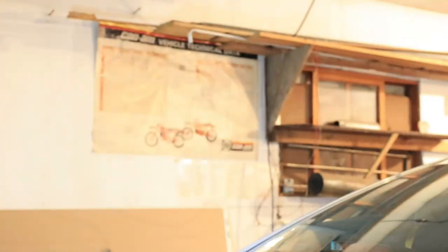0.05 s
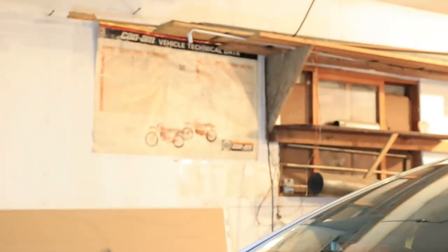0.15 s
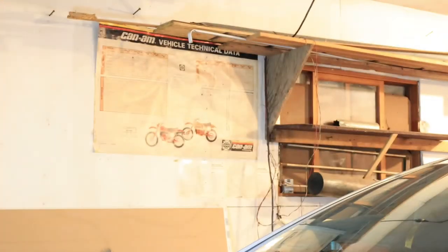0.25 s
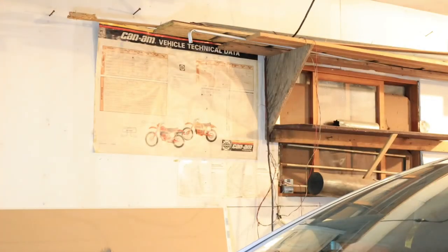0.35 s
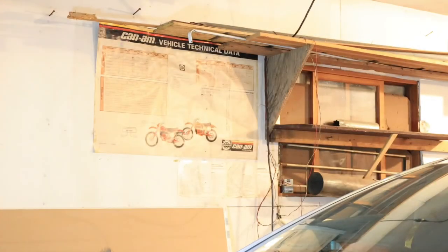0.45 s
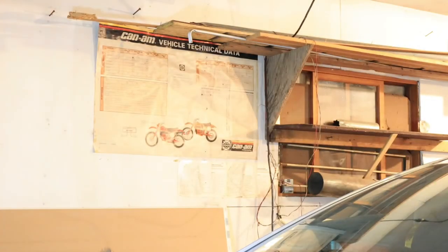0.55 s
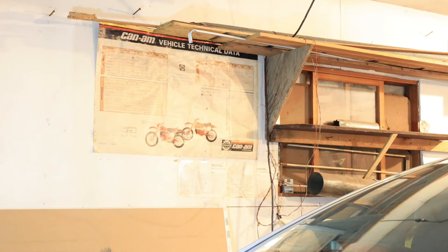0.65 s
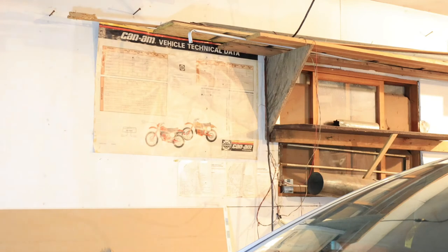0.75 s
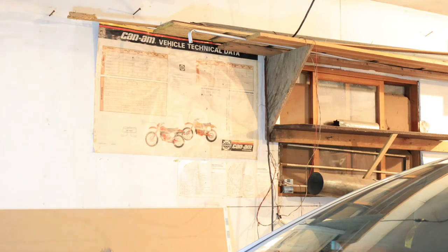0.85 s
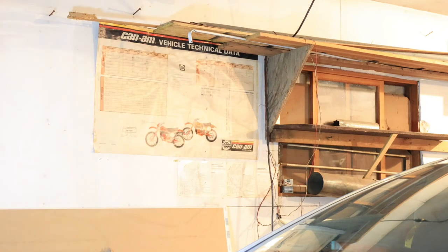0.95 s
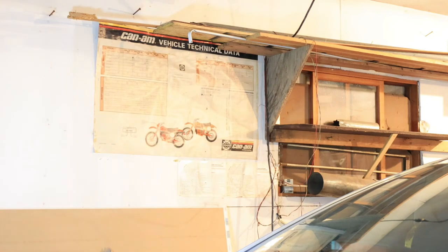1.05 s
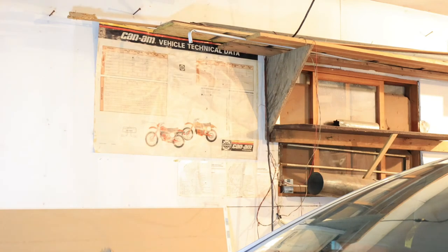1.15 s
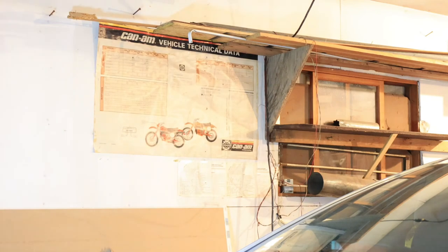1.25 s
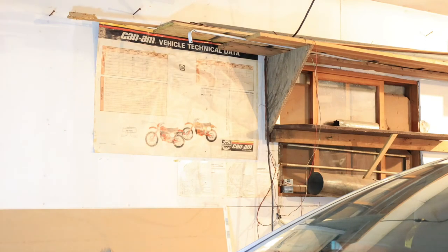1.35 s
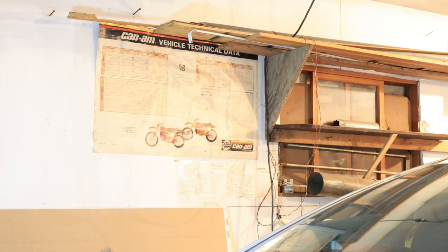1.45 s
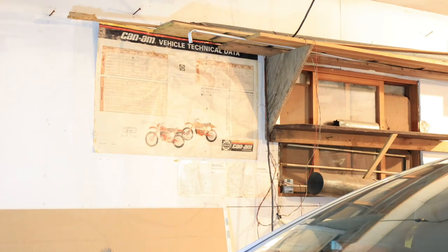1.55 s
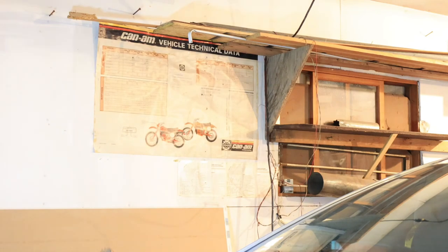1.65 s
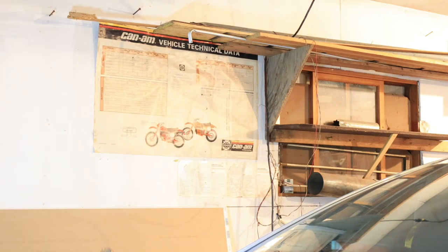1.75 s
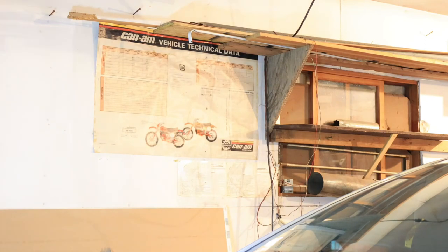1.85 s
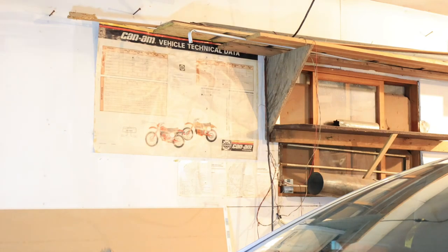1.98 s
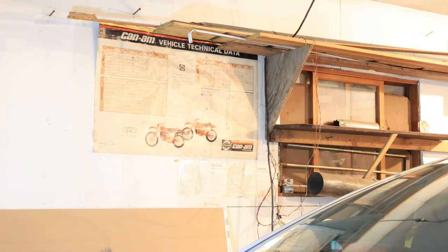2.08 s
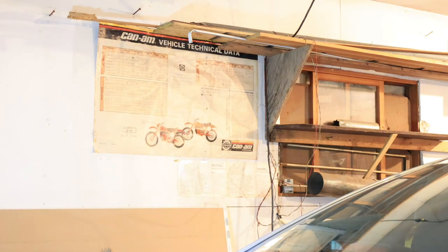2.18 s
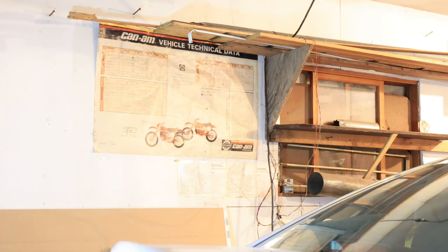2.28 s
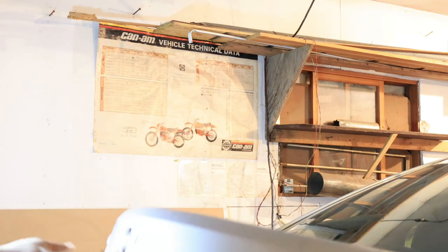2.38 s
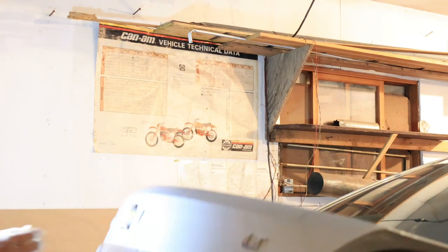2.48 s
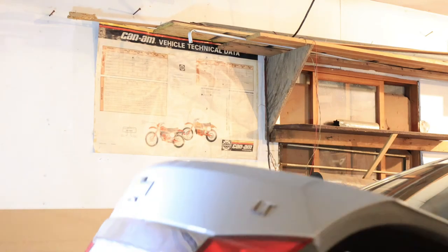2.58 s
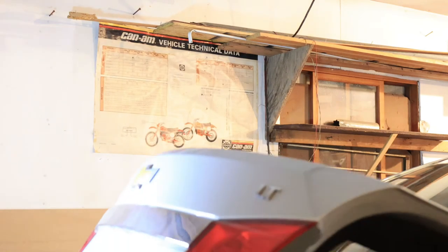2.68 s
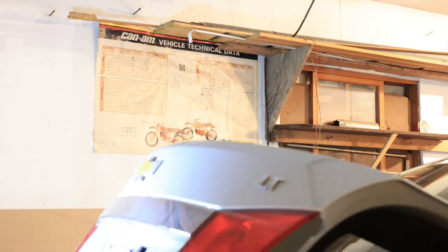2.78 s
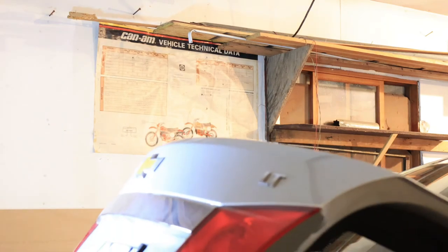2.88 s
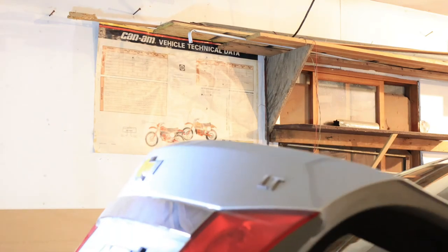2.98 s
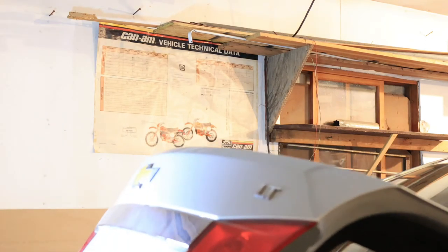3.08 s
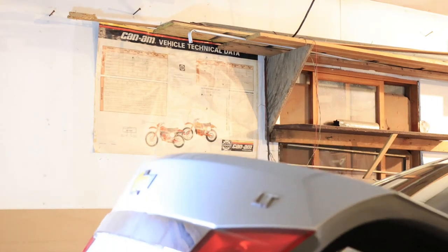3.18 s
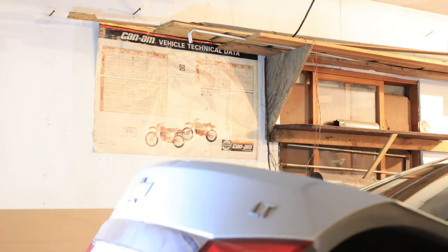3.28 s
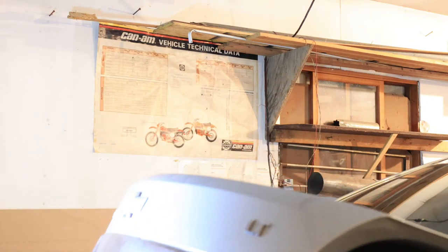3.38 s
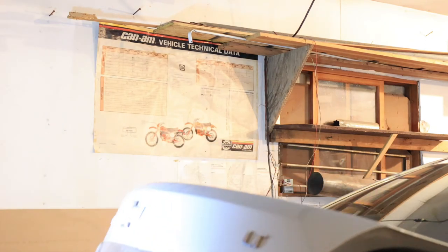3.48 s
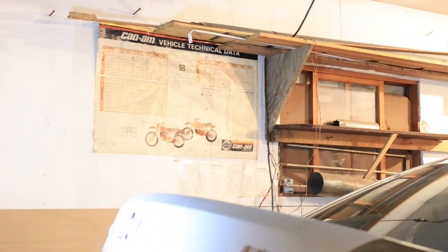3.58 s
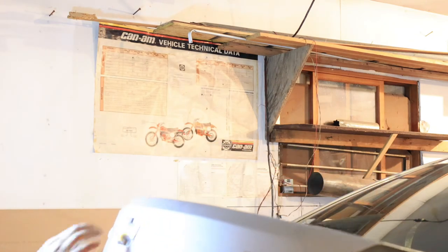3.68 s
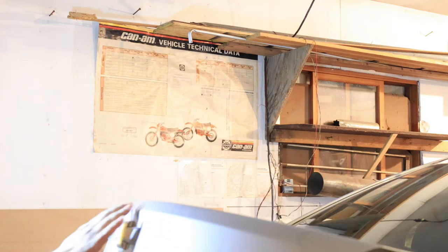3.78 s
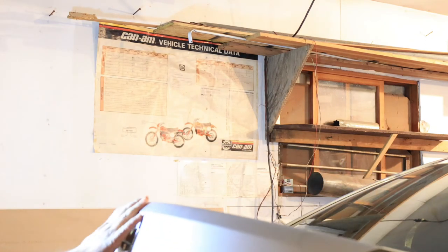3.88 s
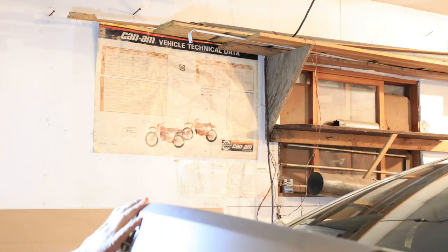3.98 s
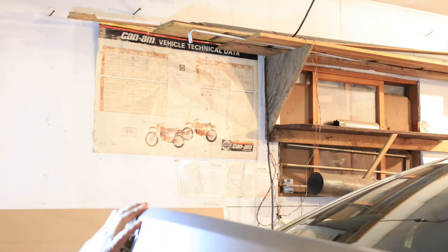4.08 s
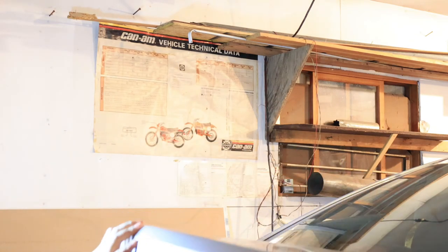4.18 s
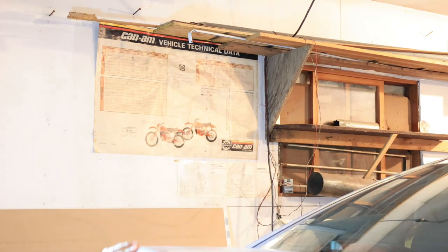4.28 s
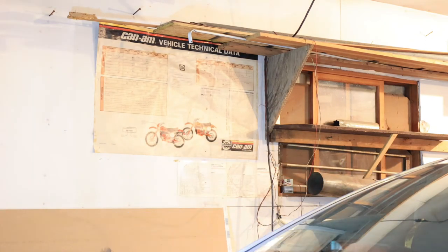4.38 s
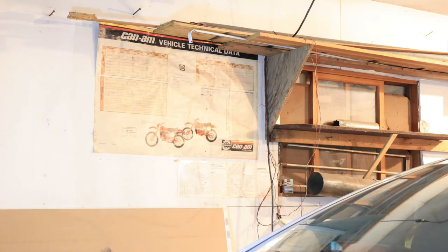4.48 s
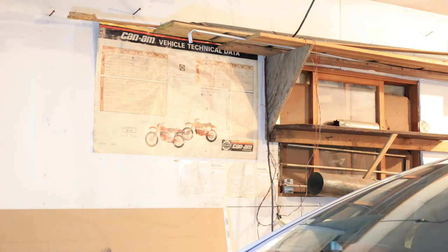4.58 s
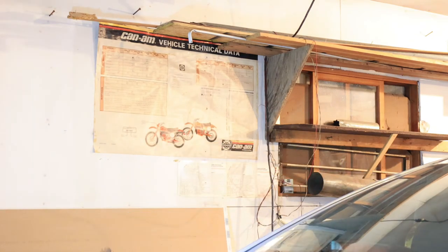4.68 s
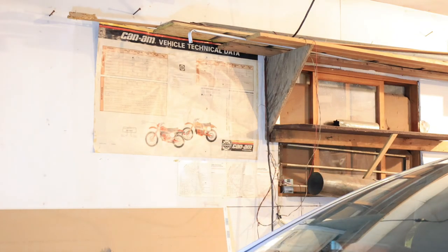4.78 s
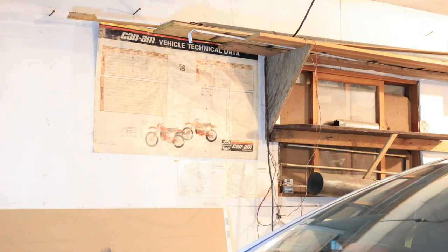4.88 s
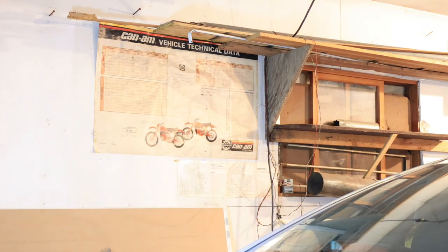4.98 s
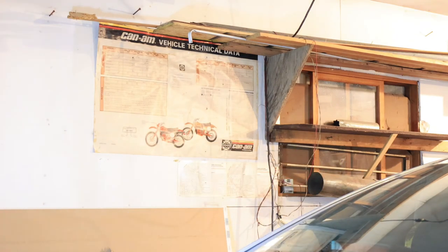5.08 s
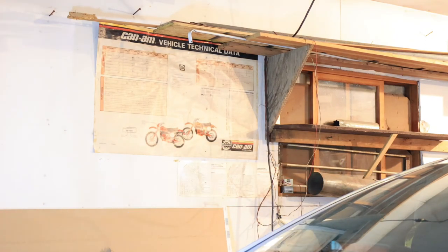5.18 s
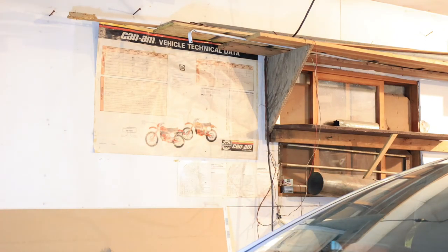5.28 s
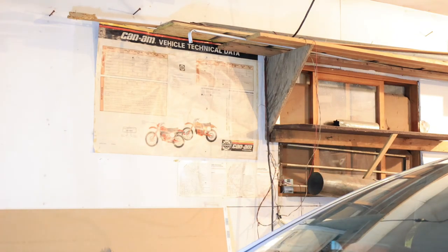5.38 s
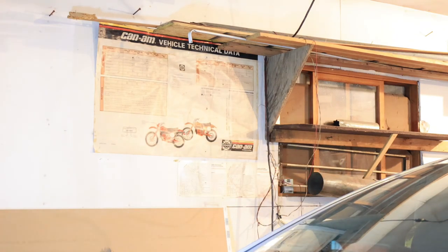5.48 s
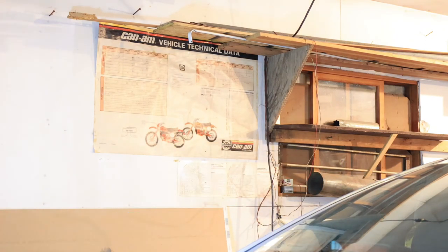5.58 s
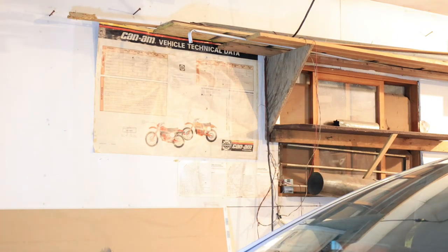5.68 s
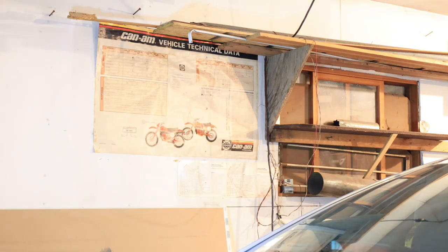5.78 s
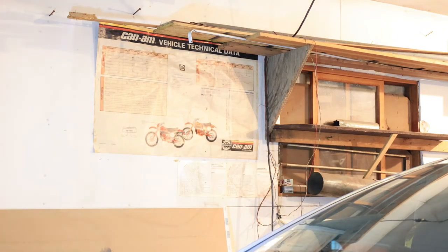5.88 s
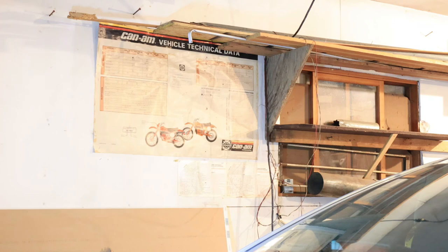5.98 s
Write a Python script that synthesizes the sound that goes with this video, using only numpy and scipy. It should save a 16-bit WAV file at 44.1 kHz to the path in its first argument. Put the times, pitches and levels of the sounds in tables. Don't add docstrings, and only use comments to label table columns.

```python
import sys
import numpy as np
from scipy import signal
from scipy.fft import rfft, irfft
from scipy.io import wavfile
from scipy.ndimage import uniform_filter1d

SR = 44100
rng = np.random.default_rng(int(sys.argv[2]) if len(sys.argv) > 2 else 0)


def level_to_linear(level):
    exponent = np.asarray(level, float) / 20
    return 10 ** exponent


def unload_audio(sound):
    columns = np.transpose(np.atleast_2d(sound))
    steps = np.round(np.clip(columns, -1, 1) * 32767)
    wavfile.write(sys.argv[1], SR, steps.astype(np.int16))


N = 266364
T = np.arange(N) / SR

# pitch_hz, level_db (per Hz)
DRONE_SPECTRUM = [(12, -17), (25, -10), (55, -1.5), (118, -4.5), (200, -4.5), (320, -13), (530, -13),
                  (775, -20), (1300, -23.5), (2500, -33), (3500, -61.5)]
# pitch_hz, level_db
HUM_LINES = [(120, -75), (359, -76), (515, -79.5)]
# time_s, level_db
LOW_HUM_LEVEL = [(0, -71.5), (.5, -72.5), (.82, -65.5), (1.02, -75.5), (2.19, -72.5), (2.74, -80.5),
                 (3.62, -84), (3.92, -71.5), (4.46, -77.5), (4.65, -66), (5.15, -70.5), (5.65, -71.5),
                 (6.04, -64.5)]
# time_s, level_db
MOVING_LEVEL = [(0, -69), (.13, -64), (.3, -71), (1.3, -79.5), (2.07, -79), (3.0, -90), (4.09, -74.5),
                (4.46, -82.5), (5.0, -87.5), (5.62, -75.5), (6.04, -71)]
# loudest_s, level_db, brightness_db
TRIM_BUZZES = [
    (0.388, -37, -19.5),
    (2.27, -43, -34),
    (4.632, -38, -16),
    (6.04, -37.5, -21),
]
# pitch_hz, level_db
BUZZ_SPECTRUM = [(2200, -15.5), (2700, -5), (3200, -2), (3550, 0.5), (3900, -2), (4350, -4.5), (4800, -10),
                 (6500, -22.5), (9000, -42)]

# start_s, steel_db, panel_db, hardness_db, length_s
SCRAPES = [(0, -61.5, -44.5, -6.5, 0.023), (0.088, -44.5, -40.5, -15, 0.12),
           (0.422, -29.5, -24, -22.5, 0.16), (.547, -46.5, -42.5, -26, 0.17), (0.776, -48, -68, -12, 0.12),
           (1.602, -57, -54, -15.5, 0.11), (3.888, -60, -65, -3, .07), (4.429, -58, -29.5, -20, 0.12),
           (4.978, -56, -38.5, -19.5, 0.12), (5.104, -54.5, -69, 0.5, .062), (5.234, -64.5, -70, 13, 0.048),
           (2.718, -74, -70, 7, 0.058), (5.451, -73.5, -77, 17.5, .2)]
# start_s, steel_db, panel_db, hardness_db, scatter_s
TOUCHES = [(.043, -62.5, -64, 9.5, .003), (.727, -60.5, -74, -4, .01), (.794, -51.5, -48, -15, 0.022),
           (0.981, -52.5, -50, -8.5, 0.0215), (1.269, -68.5, -83, 0, .01), (1.988, -72, -71.5, 10, 0.0048),
           (3.098, -65.5, -55.5, -15, 0.024), (3.258, -50.5, -37.5, -28, 0.05),
           (5.723, -73, -60.5, 7, .009), (5.766, -76, -65, 13.5, 0.0048)]
# striker_s, force_db, approach_slowness (ratio), panel_settling_db_per_s
SLAMS = [
    (.186, 0, .9, 0),
    (4.494, -1, 1.12, -40),
]
# delay_s, steel_db, panel_db, hardness_db, scatter_s
SEAL_CONTACTS = [
    (-.025, -26, -33, -17.5, .02),
    (-.0085, -12.5, -39, -7, .01),
]
# delay_s, steel_db, panel_db, hardness_db, scatter_s
SLAM_CONTACTS = [(0, -14, -16.5, 0.5, 0.018), (.006, -17.5, -23, -10.5, 0.0065),
                 (.018, -17, -13.5, -6.5, .008), (.029, -20, -15, -3, 0.0046),
                 (0.0427, -14.5, -17, -11.5, .01), (0.0553, -19.5, -13.5, 0, 0.012),
                 (.067, -26, -24.5, -11.5, .011), (0.0859, -19.5, -15, -14.5, 0.0081)]
# first_landing_s, steel_db, loss_db (per bounce)
BOUNCES = [
    (.296, -24, -5.5),
    (4.6, -38, -5.5),
]
# start_s, steel_db, panel_db, hardness_db, scatter_s
CLICKS = [(.486, -60.5, -65, 2, 0.0036), (.525, -65, -64.5, 1.5, 0.0035), (2.491, -62, -73, 2.5, .008),
          (3.247, -47.5, -53, -3, 0.0041)]
# start_s, steel_db, panel_db, hardness_db, scatter_s
MOTOR_SWITCHES = [
    (2.095, -49.5, -66.5, -7, 0.015),
    (5.856, -48, -55, -3.5, 0.022),
]
# pawl_drop_s, force_db
RELEASES = [
    (2.159, -0.5),
    (5.932, 0),
]
# delay_s, steel_db, panel_db, hardness_db, length_s
MOTOR_GEARS = [
    (-.078, -33, -32, -17.5, 0.17),
    (0.033, -24.5, -39, -7, 0.041),
]
# delay_s, steel_db, panel_db, hardness_db, scatter_s
PAWL_PULL = [(-.0275, -26, -37, -3, 0.021), (-.004, -41, -34, -25, 0.0017), (0, -17.5, -25.5, -10.5, 0.012),
             (0.0129, -23, -18.5, -25, 0.017), (0.025, -29.5, -24.5, -22, .014),
             (.045, -28, -27, -14, 0.021)]
# delay_s, steel_db, panel_db, hardness_db, scatter_s
MOTOR_RETURN = [(0.0746, -26, -42.5, -7.5, 0.0047), (.0835, -21, -31.5, 0, 0.01),
                (.106, -24.5, -53.5, -20, 0.0072), (.332, -40.5, -63, -5.5, 0.016),
                (.348, -66, -49, -18, .016), (.587, -65.5, -55, -8, .02)]
# start_s, steel_db, panel_db, hardness_db, length_s
SLEEVE_BRUSHES = [(3.873, -61.5, -65, 1.5, 0.032), (3.902, -64.5, -66, 1.5, .05)]
TICK_DB = dict(seal=-23.5, slam=-13, bounce=-17, pull=-26.5, back=-17.5, gears=-20.5, touch=-6, scrape=-12, click=-1, switch=-14, brush=0)

# pitch_hz, level_db, t60_s
PANEL_MODES = [(73.8, -14.5, 0.49), (116.7, 1, 0.26), (139.6, -1, 0.37), (170.7, 1, 0.096),
               (220, -5.5, 0.84), (230, 1, 0.11), (262, -8, 0.15), (340, -2, 0.11), (400, -10, 0.15)]
# pitch_hz, level_db, t60_s
KNOCK_MODES = [(510, 7, 0.014), (607.2, 2, 0.036), (927, 2.5, 0.02), (1044, 0.5, 0.027), (1214, -3, 0.042),
               (1293, 0, 0.028), (1608, 4, 0.016), (1768, 1, 0.017), (2176, -6, 0.025)]
# pitch_hz, level_db, t60_s
CLACK_MODES = [(2365, 5.5, 0.023), (2750, 1, 0.014), (3240, 4, 0.0094), (3700, 7, 0.0055),
               (4200, -10.5, 0.0099)]
# pitch_hz, level_db
TICK_SPECTRUM = [(5200, 3), (6500, 2), (8000, 0), (10000, -7.5), (13000, -11), (15500, -16)]
# delay_s, level_db, push_s
SLAM_PUFFS = [(-.019, -17.5, .008), (0.018, -21.5, .01)]
# delay_s, level_db, push_s
RELEASE_PUFF = (-0.0056, -37.5, 0.0046)
# pitch_hz, level_db, t60_s
TRUNK_MODES = [(24, -6.5, 0.96), (32, 5, 0.59), (39.4, 1, 0.29), (52, 3, 0.67), (62, 4, 0.38)]
# start_s, level_db
HOLLOW_KNOCKS = [(0.578, -54), (2.505, -57), (3.248, -53)]
# pitch_hz, level_db, t60_s
HOLLOW_MODES = [(211.9, -3.5, 0.13), (274.4, 2.5, 0.0875), (359, -12, 0.39), (442, 6, 0.031),
                (561.4, -1, 0.082), (710, -2, 0.027), (933, -1.5, 0.056)]
# start_s, length_s, low_hz, high_hz, level_db
SQUEAKS = [(.68, .32, 1320, 3530, -75), (.74, .22, 1810, 4430, -79), (3.875, .06, 3810, 5950, -78),
           (5.11, .075, 1920, 2900, -80), (5.238, .05, 2410, 3860, -78), (5.862, .03, 3700, 5400, -74)]
# start_s, level_db
BIRD_PHRASES = [(1.77, 1), (3.609, -1), (5.478, -1)]
# delay_s, length_s, from_hz, to_hz, level_db
BIRD_NOTES = [(-.06, .13, 3400, 3450, -89), (0, 0.066, 4200, 4200, -79), (.028, .08, 3700, 3690, -80.5),
              (0.033, 0.099, 3180, 3100, -84)]
# pitch_hz, t60_s, level_db
GARAGE_BANDS = [(69, 0.31, -9), (120.9, 0.52, -8), (270, 0.57, -7), (516, 0.63, -3), (926, 0.56, -3.5),
                (1970, 0.63, -6), (4000, 0.47, -3.5), (8300, 0.44, -5), (13500, 0.17, -10)]
# pitch_hz, level_db (per Hz)
HISS_SPECTRUM = [(30, -3.5), (300, -1.5), (900, -6), (2200, -8), (4300, -10), (8600, -13), (15500, -15)]


def level(x, db):
    return x * level_to_linear(db) / np.sqrt(np.mean(x ** 2))


def noise():
    return rng.standard_normal(N)


def colour(x, points):
    hz, db = np.transpose(points)
    log_hz = np.log(np.maximum(np.arange(len(x) // 2 + 1) * SR / len(x), 1))
    return irfft(rfft(x) * level_to_linear(np.interp(log_hz, np.log(hz), db)), len(x))


def band(x, lo_hz, hi_hz, order=2):
    sos = signal.butter(order, [lo_hz, min(hi_hz, .45 * SR)], "band", fs=SR, output="sos")
    return signal.sosfilt(sos, x)


def walk(rate_hz):
    k = int(SR / rate_hz)
    return level(uniform_filter1d(uniform_filter1d(noise(), k), k), 0)


def ring(x, modes):
    t = T[:SR]
    body = 0
    for k, (hz, db, t60) in enumerate(modes):
        body = body + (-1) ** k * level_to_linear(db) * np.sin(2 * np.pi * hz * t) * 1000. ** (-t / t60)
    return signal.fftconvolve(x, body / np.sqrt(np.sum(body ** 2)))[:N]


def pushes(rows, modes):
    force = 0
    for s, db, length in rows:
        push = np.sin(np.pi * np.clip((T - s) / length, 0, 1))
        force = force + level_to_linear(db) * push / np.sqrt(length * SR)
    return ring(force, modes) * level_to_linear(22.5)


def rustle_levels():
    moving = level_to_linear(np.interp(T, *np.transpose(MOVING_LEVEL)))
    low, high = moving, moving * level_to_linear(-5)
    for s, db, bright_db in TRIM_BUZZES:
        swell_db = 300 * (T - s)
        buzz = level_to_linear(db + np.minimum(swell_db, 172 * (s - T)))
        linger = level_to_linear(db - 23 + np.minimum(swell_db, 35 * (s - T)))
        low = low + buzz + linger
        high = high + buzz * level_to_linear(bright_db) + linger * level_to_linear(-4.5)
    return low, high


def surroundings():
    low_gain, high_gain = rustle_levels()
    drone = level(colour(noise(), DRONE_SPECTRUM), -67) * level_to_linear(0.85 * walk(4.2))
    hum = sum(level(band(noise(), hz * .975, hz * 1.025), db) for hz, db in HUM_LINES)
    low_hum = level(band(noise(), 74, 88), 7.9) * level_to_linear(np.interp(T, *np.transpose(LOW_HUM_LEVEL)))
    low = level(band(noise(), 320, 1600), 4.5) * low_gain * level_to_linear(1.6 * walk(30))
    high = level(colour(noise(), [(1200, -42)] + BUZZ_SPECTRUM), 4.1)
    high = high * high_gain * level_to_linear(2.9 * walk(33))
    return drone + hum + low_hum + low + high


def earlier_push():
    return level_to_linear(-47.5) * np.sin(2 * np.pi * 127 * T) * 1000. ** (-T / 0.33)


def placed(blows, sequence):
    return [(s + delay, steel_db + db, panel_db + db, *rest)
            for s, db in blows for delay, steel_db, panel_db, *rest in sequence]


def slam_strikes(sequence):
    rows = []
    for s, force_db, slow, settle in SLAMS:
        for delay, steel_db, panel_db, hard_db, scatter in sequence:
            start = s + delay * (slow if delay < 0 else 1)
            settled_db = panel_db + force_db + settle * max(delay, 0)
            rows.append((start, steel_db + force_db, settled_db, hard_db, scatter))
    return rows


def trim_bounces():
    flights = .0525 * .935 ** np.arange(6)
    landing_delays = np.cumsum(flights) - flights

    def landings(extra_loss_db):
        return [(s + delay, db + k ** 1.3 * (loss_db + extra_loss_db))
                for s, db, loss_db in BOUNCES for k, delay in enumerate(landing_delays)]

    first_edge, second_edge = [(0, 0, -7, 2.5, .0035)], [(.0105, -1.5, -14, 2.5, .0035)]
    return placed(landings(0), first_edge) + placed(landings(-2.5), second_edge)


def strikes():
    return [("scrape", 1, SCRAPES), ("touch", 0, TOUCHES),
            ("seal", 0, slam_strikes(SEAL_CONTACTS)), ("slam", 0, slam_strikes(SLAM_CONTACTS)),
            ("bounce", 0, trim_bounces()), ("click", 0, CLICKS),
            ("gears", 1, placed(RELEASES, MOTOR_GEARS)), ("switch", 0, MOTOR_SWITCHES),
            ("pull", 0, placed(RELEASES, PAWL_PULL)), ("back", 0, placed(RELEASES, MOTOR_RETURN)),
            ("brush", 1, SLEEVE_BRUSHES)]


def impact_spray(sliding, span):
    t = T[:SR // 4]
    chance = rng.standard_normal((5, len(t)))
    spray = chance[:4] * level_to_linear(2.5 * np.abs(chance[4]))
    if sliding:
        spray *= np.sin(np.pi * np.minimum(t / span, 1)) ** 0.54
    else:
        fade_s = np.clip(span * np.array([[1], [1], [.8], [.45]]), .0005, .05)
        spray *= np.exp(-t / fade_s) * (1 - np.exp(-t / .0005))
        spray[0] = 0.5 * spray[0] - 3 * t / 0.00073 * np.exp(-t / .0006)
    return spray / np.sqrt(np.sum(spray ** 2, axis=1, keepdims=True))


def contacts():
    force = np.zeros((4, N + SR))
    for kind, sliding, rows in strikes():
        for s, knock_db, thump_db, hard_db, span in rows:
            clack_db = knock_db + hard_db
            levels_db = np.array([[thump_db], [knock_db], [clack_db], [clack_db + TICK_DB[kind]]])
            start, spray = int(s * SR), impact_spray(sliding, span)
            force[:, start:start + spray.shape[1]] += spray * level_to_linear(levels_db)
    thump, knock, clack, tick = force[:, :N]
    knock = band(knock, 350, 2800, order=3)
    clack = band(clack, 2400, 4800, order=3)
    steel = ring(knock, KNOCK_MODES) * level_to_linear(23.5) + knock * level_to_linear(28.0)
    steel += ring(clack, CLACK_MODES) * level_to_linear(23.5) + clack * level_to_linear(24.0)
    steel += colour(tick, [(3500, -30.0)] + TICK_SPECTRUM) * level_to_linear(29.0)
    panel = ring(thump, PANEL_MODES) * level_to_linear(6.0) + band(thump, 160, 420) * level_to_linear(36.5)
    return steel + panel


def trunk_air():
    puffs = [(s + delay, db + puff_db, length)
             for s, db, *_ in SLAMS for delay, puff_db, length in SLAM_PUFFS]
    delay, puff_db, length = RELEASE_PUFF
    puffs += [(s + delay, db + puff_db, length) for s, db in RELEASES]
    return pushes(puffs, TRUNK_MODES) * level_to_linear(-19.0)


def hollow_knocks():
    return pushes([(s, db + 9.0, .0006) for s, db in HOLLOW_KNOCKS], HOLLOW_MODES)


def squeaks():
    out = 0
    for s, length, low_hz, high_hz, db in SQUEAKS:
        pair = sum(level(band(noise(), hz - 70, hz + 70), db) for hz in (low_hz, high_hz))
        out = out + pair * np.sin(np.pi * np.clip((T - s) / length, 0, 1))
    return out


def bird():
    out = np.zeros(N)
    for start, phrase_db in BIRD_PHRASES:
        for delay, length, from_hz, to_hz, db in BIRD_NOTES:
            progress = np.clip((T - start - delay) / length, 0, 1)
            hz = (from_hz + (to_hz - from_hz) * progress) * (1 + .02 * walk(400))
            loudness = level_to_linear(db + phrase_db + 10 + 3.3 * walk(300)) * np.sin(np.pi * progress)
            out += loudness * np.sin(2 * np.pi * np.cumsum(hz) / SR)
    return out


def garage(x):
    t = T[:int(1.5 * SR)]
    tail = 0
    for hz, t60, db in GARAGE_BANDS:
        part = band(rng.standard_normal(len(t)), hz / 1.414, hz * 1.38)
        part = part * 1000. ** (-t / t60) * (1 - np.exp(-t / 0.0009))
        tail = tail + part * level_to_linear(db) / np.sqrt(np.sum(part ** 2) / (hz * 1.3 / SR))
    return x + signal.fftconvolve(x, tail)[:N]


def scene():
    echoing = garage(contacts() + hollow_knocks() + squeaks() + bird())
    left = surroundings() + earlier_push() + echoing + trunk_air()
    return np.array([left, np.zeros(N)])


def band_limit(x):
    return signal.sosfilt(signal.butter(12, 15730, fs=SR, output="sos"), x)


def record(dry):
    left = np.tanh(.55 * dry[0]) / 0.56
    leak = signal.lfilter(*signal.butter(1, 105, fs=SR), left) * level_to_linear(-36)
    hiss = [level(colour(noise(), HISS_SPECTRUM), -74 + db) for db in (-1.5, 0)]
    return band_limit(np.array([left, leak]) + hiss)


dry = scene()
out = record(dry)
unload_audio(out)
```